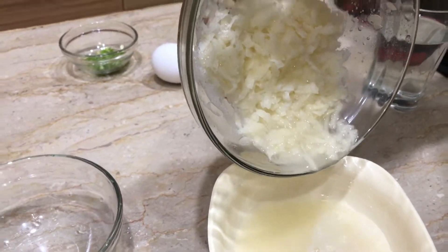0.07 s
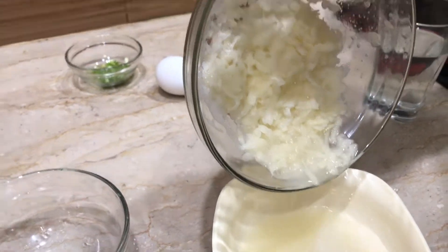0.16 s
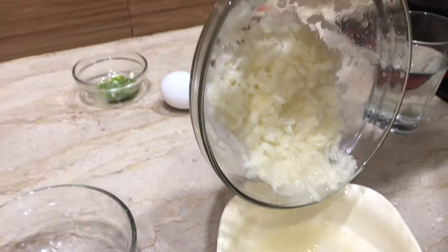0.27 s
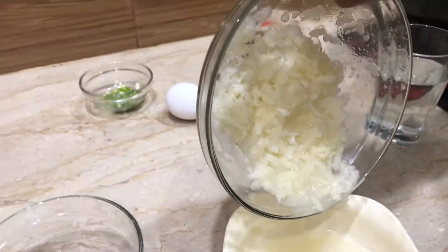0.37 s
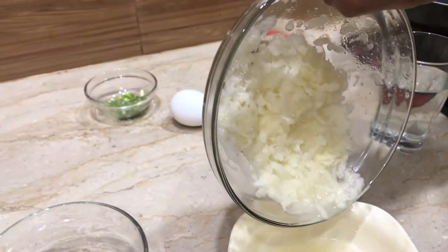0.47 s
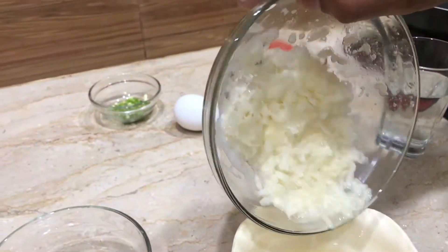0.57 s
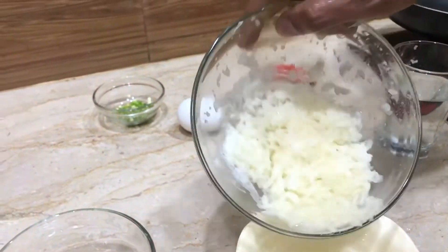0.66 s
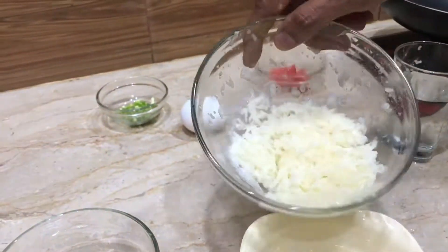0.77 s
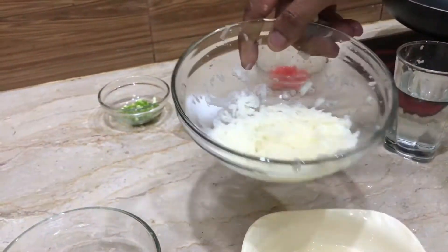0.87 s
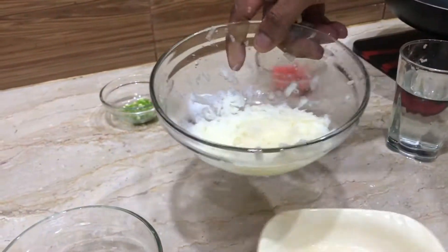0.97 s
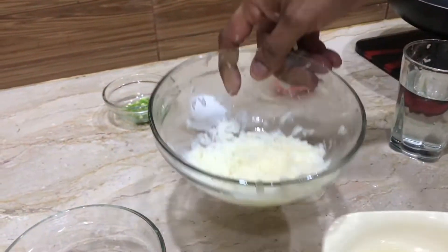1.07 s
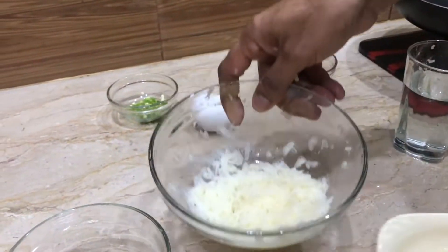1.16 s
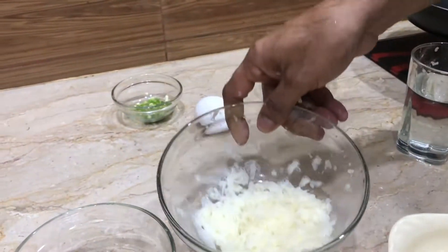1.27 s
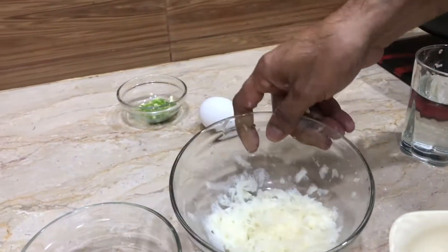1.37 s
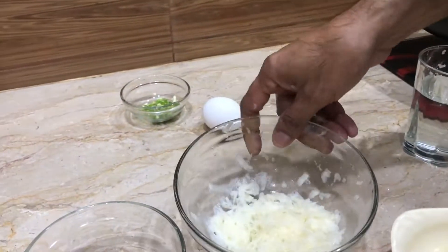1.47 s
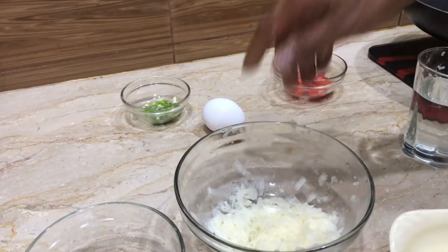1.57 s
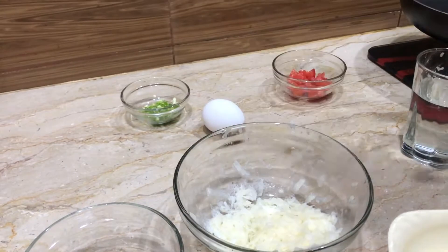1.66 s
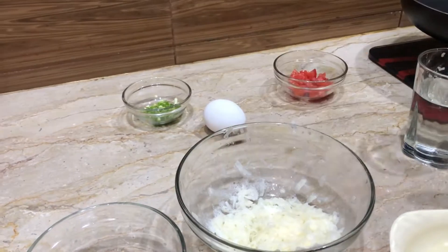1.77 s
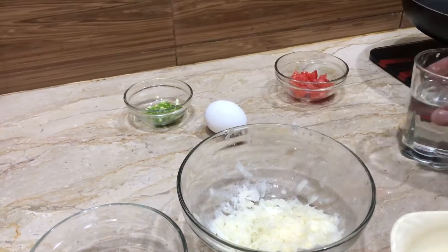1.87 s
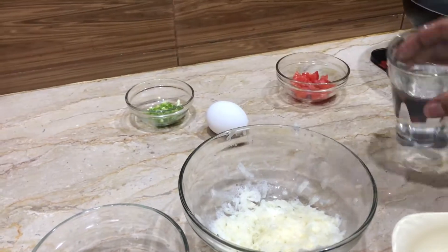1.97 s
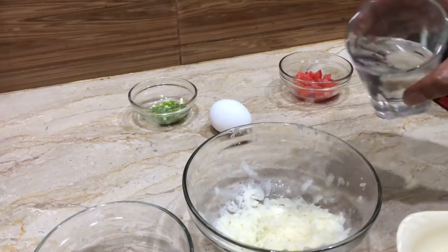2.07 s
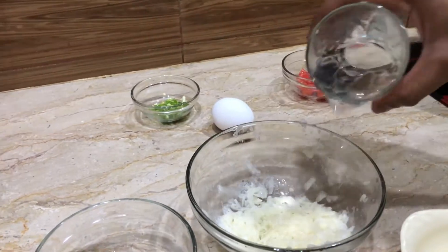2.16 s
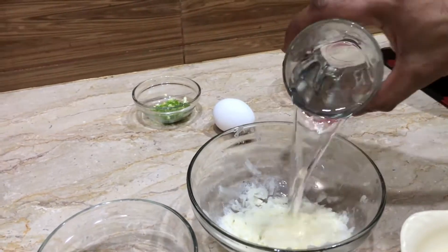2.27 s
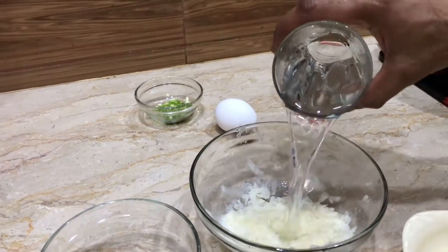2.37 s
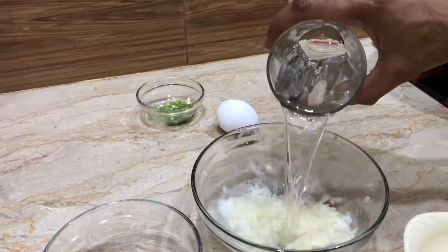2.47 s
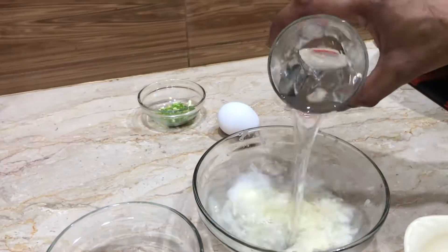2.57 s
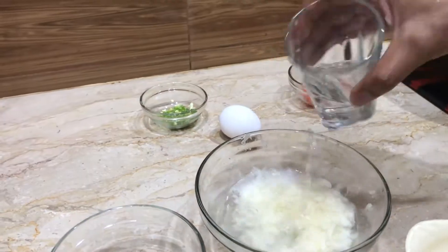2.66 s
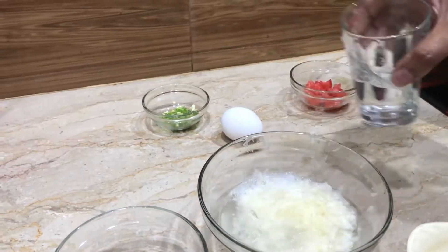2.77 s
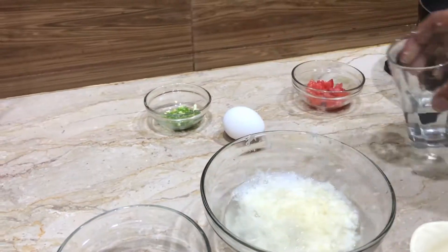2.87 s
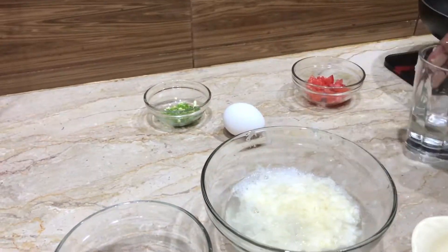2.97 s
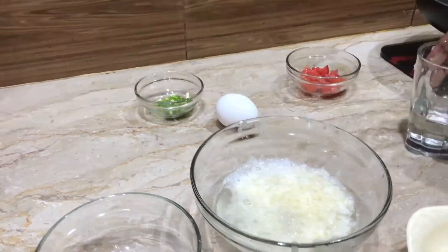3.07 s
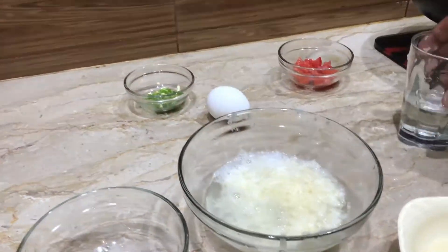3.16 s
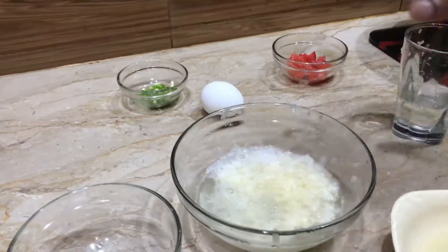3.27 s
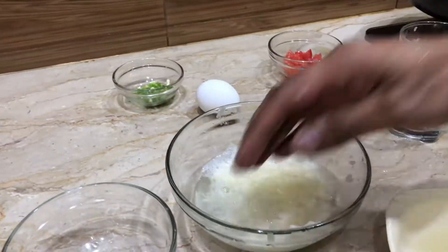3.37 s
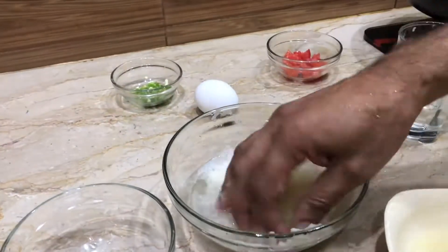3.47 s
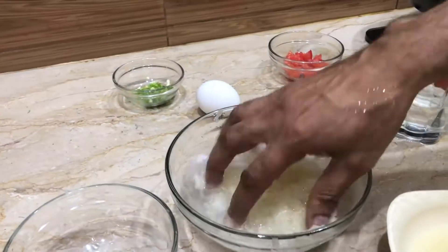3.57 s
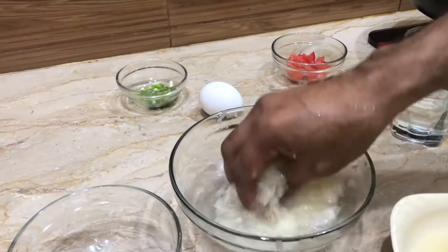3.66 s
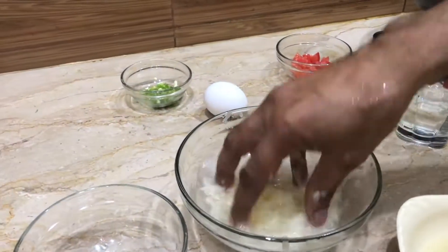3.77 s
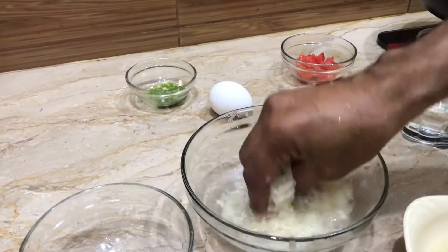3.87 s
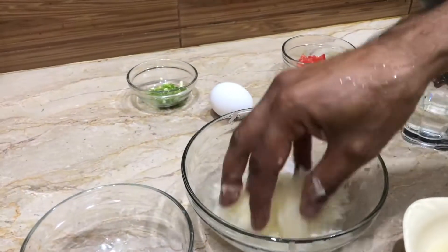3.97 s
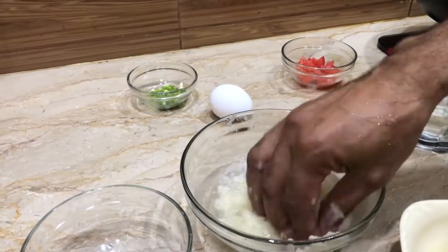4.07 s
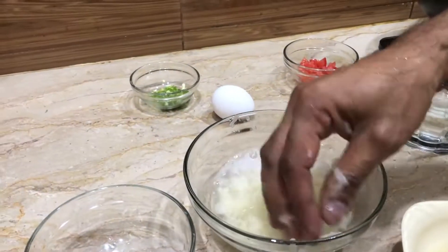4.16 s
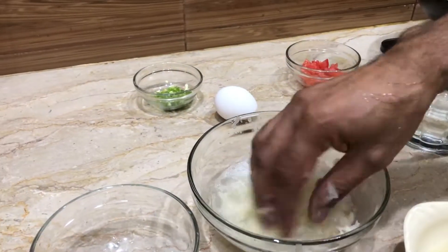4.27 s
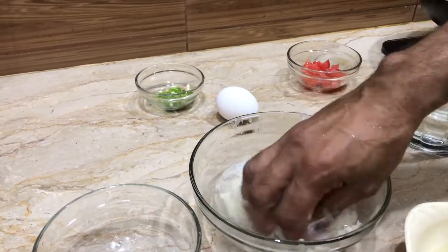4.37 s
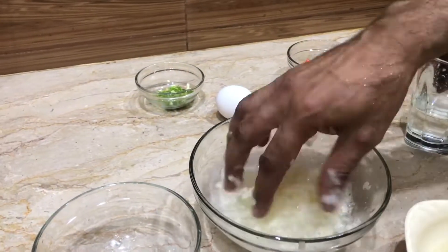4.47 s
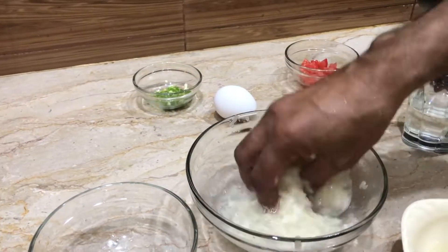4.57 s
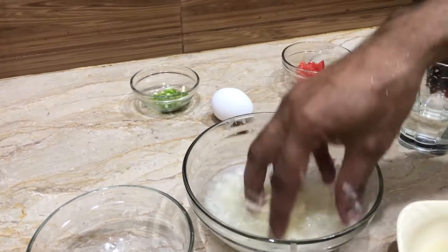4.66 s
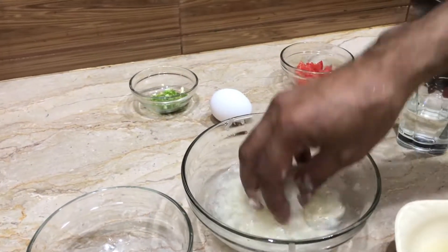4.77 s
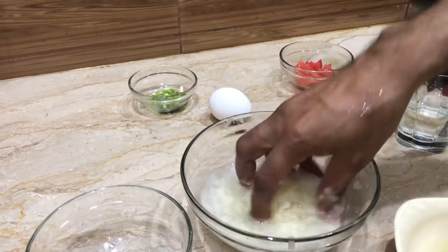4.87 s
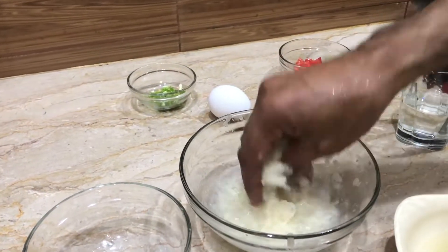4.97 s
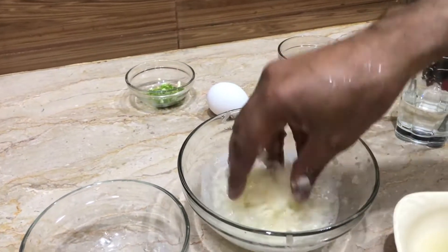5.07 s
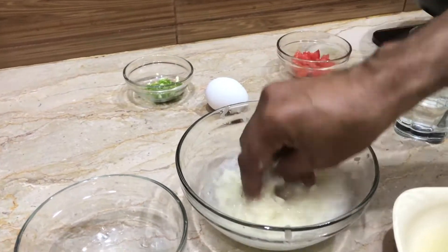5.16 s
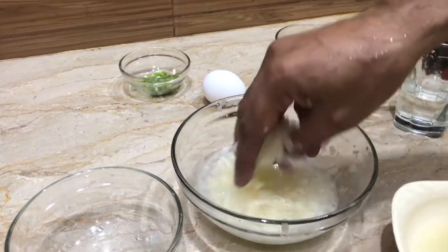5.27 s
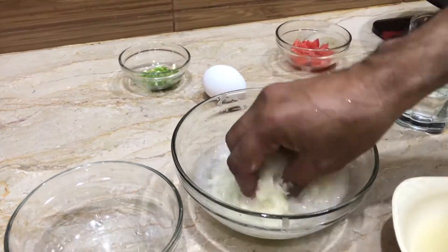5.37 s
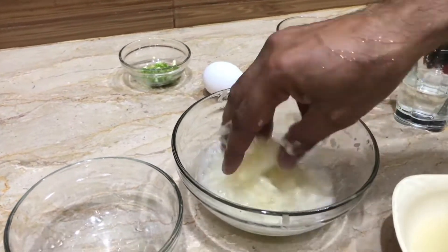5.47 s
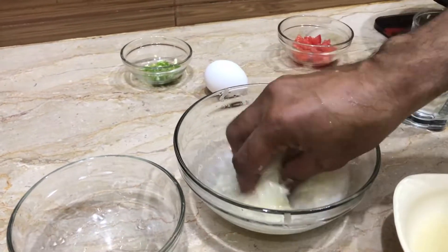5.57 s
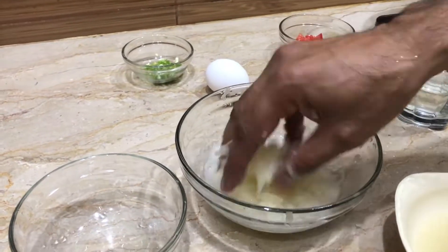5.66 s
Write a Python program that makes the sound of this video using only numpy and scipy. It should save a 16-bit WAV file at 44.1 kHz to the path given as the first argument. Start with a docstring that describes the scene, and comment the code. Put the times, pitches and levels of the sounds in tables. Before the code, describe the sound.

Water drips from a glass bowl, the bowl knocks onto stone, a full glass rattles, water fizzes briefly, then wet shreds are stirred.

```python
"""A quiet kitchen with a stone counter: hum and broad air noise, and water dripping from a tilted glass bowl.
The bowl slides by stick-slip friction and lands in two rattling groups of knocks, heard as damped modes.
A full drinking glass scrapes and chatters over the stone, its modes excited by slips and bounces.
Water falls on grated potato as a fizz of tiny snaps, and the emptied glass is put down.
A hand stirs the wet shreds: films snap, bubbles ring as gliding damped sines, nails clink on the bowl."""
import sys
import numpy as np
from scipy import signal
from scipy.fft import rfft, irfft
from scipy.io import wavfile
from scipy.ndimage import uniform_filter1d

SR = 44100
rng = np.random.default_rng(int(sys.argv[2]) if len(sys.argv) > 2 else 0)


def file_out(sig):
    """Save sig as 16-bit WAV at sys.argv[1]."""
    # one column per channel
    cols = np.atleast_2d(sig).T
    # limit, then scale
    lim = np.clip(cols, -1, 1)
    pcm = np.round(lim * 32767).astype(np.int16)
    wavfile.write(sys.argv[1], SR, pcm)


N = 251811

# Spectrum of the steady kitchen air: (frequency [Hz], relative density [dB per Hz])
AIR_SPECTRUM = [(40, -40.5), (86, -29), (117, -8), (177, -12), (254, -4.5), (330, -12), (484, -0.5),
                (832, -6.5), (1430, -9), (4000, -12.5), (8000, -23.5), (15500, -33), (15900, -54),
                (16500, -67)]
# Room modes the air excites: (frequency [Hz], width of each of two filter passes [Hz], level [dB])
AIR_MODES = [(116.3, 29, -72), (252, 108, -61.5), (475.4, 67, -68.5)]
# Motor hum: (frequency [Hz], level [dB])
MOTOR_HUM = (65.4, -79)
# Low tones and a thin whistle: (start [s], end [s], frequency [Hz], level [dB], pulse rate [per s])
FAINT_TONES = [(0.02, 0.336, 126, -59, 2.4), (.28, .46, 211, -61, 1.6), (2.282, 2.573, 208, -59.5, 1),
               (4.197, 4.793, 5580, -68.5, 25.5)]
# Crackle of wet shreds as the bowl drains, water lands and the hand stirs:
# (start [s], rise [s], hold [s], fall [s], level [dB])
SHRED_SWELLS = [(0.05, 0.21, .4, .12, -76.5), (2.05, .2, 0.46, .05, -81), (3.097, .5, 2.2, .1, -75)]
# Wet films tearing and drops splitting: (time [s], level [dB], centre [Hz], nominal length [s])
FILM_SNAPS = [(.2937, -53, 11000, .003), (.3112, -50, 11000, .004), (0.326, -40, 8350, .0027),
              (.398, -49, 13700, .0039), (0.914, -39, 6400, .002), (2.231, -42, 9300, .0019),
              (2.3196, -33.5, 10500, .0012), (2.372, -42, 11200, .003), (2.652, -44, 11500, .0026),
              (2.676, -39, 11300, .0043), (2.7, -49, 10900, .003), (3.739, -37.5, 6600, 0.015),
              (3.7484, -28.5, 12700, 0.005), (3.819, -44, 6660, .0049), (3.9777, -38, 11300, 0.003),
              (3.9823, -28, 9600, 0.0062), (4.371, -48, 4500, .003), (4.378, -47, 9000, .003),
              (4.5345, -38.5, 9800, .003), (4.643, -48, 9070, 0.0036), (4.8, -51.5, 9000, .003),
              (4.935, -53, 11000, .004), (5.0467, -36, 9400, .002), (5.05, -32, 8300, .002),
              (5.0657, -28.5, 6200, 0.0022), (5.127, -44, 8100, .003), (5.306, -28.5, 7400, 0.011),
              (5.472, -48, 11300, .003), (5.482, -39.5, 11300, .0048), (5.688, -37, 7360, 0.004),
              (5.692, -30, 13100, .0026), (5.6946, -30, 7300, 0.0055)]
# Air bubbles in water, plus one light clink at 3.41 s rung the same way: (time [s], level [dB], first frequency
# [Hz], pitch change over its t60 [share])
BUBBLES = [(0.3287, -33.5, 7800, 0.27), (0.4592, -36, 7130, .16), (0.4669, -37.5, 7430, .15),
           (.4754, -40, 14000, 0.093), (0.5003, -48.5, 3900, .55), (.527, -51, 4200, 1.6),
           (.556, -60, 4100, 1.1), (0.5804, -44.5, 12000, -0.092), (0.603, -43.5, 1750, .1),
           (0.6352, -39.5, 9600, 0.13), (.635, -42.5, 3300, 1.7), (.6704, -36.5, 5970, 0.27),
           (2.5084, -48, 6030, -0.0078), (2.5671, -43, 6100, .15), (2.6125, -43.5, 11500, .15),
           (2.6658, -44.5, 2440, .22), (3.4133, -43, 2050, .23), (3.63, -50.5, 2360, .2),
           (3.752, -46.5, 3620, -0.0048), (3.7958, -43, 2160, 0.11), (3.911, -52, 10900, -0.072),
           (3.985, -46, 2100, .15), (4.3637, -46.5, 6230, .14), (4.3844, -49, 2060, 0.12),
           (4.5372, -45, 2050, .1), (4.538, -46, 3680, .1), (4.5474, -44, 2080, 0.2),
           (4.9113, -40, 3600, .15), (4.9115, -48, 7500, -0.26), (4.9175, -42, 3800, .4),
           (5.0671, -23.5, 2050, 0.042), (5.3068, -47, 1950, 0.18), (5.3514, -38.5, 3470, -0.38)]
# Gliding rim squeaks: (first [Hz], last [Hz], level in first push [dB], level in second push [dB])
RIM_SQUEAKS = [(1080, 994, -66, -59.5), (4400, 4700, -62.5, -59), (7140, 7700, -58, -54),
               (9300, 9150, -64, -58.5), (9950, 12000, -58.5, -74), (11870, 12600, -69, -62)]
# Pushes that make the rim squeak: (start [s], rise [s], hold [s], fall [s])
RIM_PUSHES = [(.93, .03, .1, .06), (1.04, .055, .095, .02)]
# Bowl landing and rocking: (time [s], level [dB], brightness [dB per octave], thud relative level [dB])
BOWL_KNOCKS = [(1.3445, -3.5, -0.5, -27), (1.3830, -14, -4.5, -21.5), (1.511, -2.5, 2, -22.5),
               (1.529, -7.5, 0, -35), (1.5413, -8.5, 0, -33), (1.548, -21, -2, -32)]
# Bowl modes damped by potato: (frequency [Hz], width before ring scaling [Hz], relative level [dB])
BOWL_MODES = [(1530, 150, -18), (1750, 410, -3.5), (2154, 244, -0.5), (2470, 540, -8.5), (3194, 640, 0.5),
              (4200, 430, -19), (5050, 180, -17), (6080, 710, -8), (7560, 470, -20), (8740, 870, -21.5),
              (12290, 400, -19.5), (14750, 500, -25)]
# Counter slab modes: (frequency [Hz], width before ring scaling [Hz], relative level [dB])
SLAB_MODES = [(325, 59, 1), (677, 36, -4.5)]
# Bowl base buzzing on grit after a knock: (frequency [Hz], relative density [dB per Hz])
BOWL_BUZZ = [(290, -50), (500, -24.5), (1080, -14.5), (1320, -9), (1930, -0.5), (3390, -10.5),
             (5630, -21.5), (6900, -29), (9490, -27.5), (12100, -43), (16000, -37)]
# Scraping glass foot: (start [s], rise [s], hold [s], fall [s], level [dB])
GLASS_SCRAPES = [(1.842, 0.018, .004, 0.13, -52.5), (1.951, 0.058, 0.054, .23, -28)]
# Glass foot striking the stone: (time [s], level [dB])
GLASS_BOUNCES = [(1.9472, -38.5), (1.966, -32.5), (1.9930, -31), (2.0002, -8), (2.0332, -7.5), (2.048, -20),
                 (2.0560, -12), (2.0744, -16.5), (2.101, -17), (2.134, -33)]
# Full glass: (frequency [Hz], width before scaling [Hz], relative level [dB])
GLASS_MODES = [(1452, 230, 11), (2200, 190, 7.5), (3127, 113, 11.5), (3910, 110, 1.5), (4500, 90, 4),
               (5260, 50, -5), (6200, 89, -3), (7030, 64, 1), (7270, 70, 3), (8180, 70, 2.5), (9380, 34, 0),
               (12000, 43, -13), (12700, 37, -10), (13080, 40, -14), (14300, 90, -10), (15200, 40, -20)]
# Water column, counter and foot: (frequency [Hz], width before scaling [Hz], relative level [dB])
COLUMN_MODES = [(111, 23, -22), (269, 127, -3), (560, 56, -8), (798, 130, -2.5), (1404, 37, -18.5),
                (10900, 83, 2)]
# Crack of each glass bounce: (frequency [Hz], relative density [dB per Hz])
BOUNCE_CRACK = [(180, -44), (300, -13.5), (2170, 0.5), (5800, -9.5), (7200, -4.5), (8640, -13.5),
                (9240, -7), (12300, -15), (16000, -30)]
# Fizz of the stream landing: (start [s], rise [s], hold [s], fall [s], level [dB])
POUR_SWELL = (2, .2, 0.48, 0.1, -61.5)
# Bands where the pouring fizz is strongest: (frequency [Hz], width [Hz], relative level [dB])
FIZZ_BANDS = [(6100, 1300, -2.5), (11300, 3200, -4), (2200, 490, -5.5)]
# Emptied glass landing: (time [s], level [dB], brightness [dB per octave])
GLASS_LANDINGS = [(3.0696, -15, 1)]
# Empty glass: (frequency [Hz], width before ring scaling [Hz], relative level [dB])
EMPTY_GLASS_MODES = [(352, 21, -18), (732, 69, -14), (903, 72, -12.5), (1250, 190, -21), (1610, 60, -8),
                     (1967, 23, -4.5), (2390, 390, -8), (3080, 370, -9), (3720, 440, -6.5),
                     (5100, 500, -14), (6650, 400, -17), (8470, 620, -19), (13100, 160, -28),
                     (14900, 80, -25)]
# Crack of that landing: (frequency [Hz], relative density [dB per Hz])
LANDING_CRACK = [(240, -53), (400, -21), (879, -8), (1040, -22), (1960, -5.5), (6850, -17.5), (9760, -36),
                 (15300, -34), (16000, -45)]
# Fingernails touching the bowl: (time [s], level [dB], lift of the lowest mode [dB])
NAIL_CLINKS = [(4.1927, -44, 2.5), (4.2076, -40.5, 28), (4.5047, -43.5, 1.5), (4.68, -60, 0),
               (4.853, -34, -3.5)]
# Bowl modes under a nail: (frequency [Hz], relative level [dB], t60 [s])
CLINK_MODES = [(1373, 4.5, 0.21), (2000, 21.5, 0.021), (3300, -12, 0.054), (5820, 0, 0.18),
               (9000, -1, 0.08), (12700, -13, 0.055)]
# Reverberation of the kitchen: (frequency [Hz], t60 [s])
ROOM_T60 = [(150, 0.46), (400, 0.55), (1040, 0.25), (2760, 0.31), (7280, 0.23), (14000, 0.19)]

AIR_DB = -59.5
SWELL_DEPTH_DB = 40  # a swell starts and ends this far below its top
# bowl sliding over the wet rim of the dish: start, rise, hold, fall [s]
SLIDE_HISS, SLIDE_RUB = (.925, .025, .23, .04), (.8, .2, .16, .12)
HISS_DB, RUB_DB = -56, -56.5
SQUEAK_WAVER_DB = 0.2  # rms pitch wander, as 20 log10 of the frequency ratio
BRIGHT_AT_FULL_DB, BRIGHT_PER_DB = 6.5, 0.47  # harder bounces ring brighter [dB per octave]
# ring time at 2 kHz [s]; power by which higher bubbles die sooner; extra life of gliding ones
BUBBLE_T60_S, BUBBLE_SHORTENS, GLIDING_LASTS = .017, 0.84, .5
SPLASH_DB, SPLASH_PER_DB = -45.5, 0.57  # splash of a -43.5 dB bubble; its growth with bubble level
CEILING = 1.3  # amplitude toward which loud peaks are softly rounded
EDGE_HZ = 16700  # upper band limit


def amp(db):
    """Level law: decibels to amplitude gain."""
    return 10 ** (np.asarray(db) / 20)


def evened(x):
    """Energy normalisation: scales to rms 1."""
    return x / np.sqrt(np.mean(x ** 2) + 1e-20)


def peaked(x):
    """Peak normalisation: scales to peak 1."""
    return x / (abs(x).max() + 1e-12)


def read(points, hz):
    """Interpolation of a spectrum table on a log-frequency axis."""
    f, value = np.transpose(points)
    return np.interp(np.log(hz + 1), np.log(f + 1), value)


def add(mix, start, sound):
    """Superposition: adds a sound into the mix at a time in seconds."""
    part = mix[round(start * SR):][:len(sound)]
    part += sound[:len(part)]


def resonate(x, hz, width):
    """Resonance by heterodyning: a one-pole filter around a pitch that may move."""
    turn = np.exp(2j * np.pi * np.cumsum(hz * np.ones(len(x))) / SR)
    r = np.exp(-np.pi * width / SR)
    return 2 * (turn * signal.lfilter([1 - r], [1, -r], x / turn + 1e-18)).real


def flicker(length, spread_db, size):
    """Slow amplitude modulation: smoothed random gain, as grip comes and goes."""
    drift = uniform_filter1d(rng.standard_normal(length), size)
    return amp(spread_db * evened(uniform_filter1d(drift, size)))


def swell(start, rise, hold, fall, db):
    """Exponential envelope: rises, holds and falls along straight lines in dB, silent outside."""
    times = start + np.cumsum([0, rise, hold + 1e-4, fall])
    levels = db - SWELL_DEPTH_DB * np.array([1, 0, 0, 1])
    return amp(np.interp(np.arange(N) / SR, times, levels, left=-200, right=-200))


def scattered(gain, decay):
    """Shot noise: a short dying burst of tiny impacts with the smooth colour given by gain."""
    t = np.arange(2 * len(gain) - 2) / SR
    shape = (1 - np.exp(-t / 0.00019)) * np.exp(-t / decay)
    z = rfft(rng.standard_normal(len(t)) * shape)
    burst = irfft(gain * z / (abs(z) + 1e-12))  # keeps the phase, imposes the colour
    return burst * np.minimum(3 * np.sqrt(shape / shape.max()), 1)


def grit(colour, bright_db, decay):
    """Contact noise: the crack of a hard contact, its spectrum tilted by brightness."""
    hz = np.fft.rfftfreq(7000, 1 / SR)
    tilt = bright_db * np.log2((hz + 50) / 2000)
    return peaked(scattered(amp(read(colour, hz) + tilt), decay))


def ringing(modes, bright_db, ring):
    """Modal superposition: damped modes start together; harder contact lifts the upper ones."""
    t = np.arange(7000) / SR
    body = np.zeros(len(t))
    for k, (hz, width, db) in enumerate(modes):
        sign = (-1) ** k  # neighbouring modes move in opposite sign
        gain = sign * amp(db + bright_db * np.log2(hz / 2000)) * np.sqrt(width)
        body += gain * np.exp(-np.pi * width * t / ring) * np.sin(2 * np.pi * hz * t)
    return peaked(body * (1 - np.exp(-(t / 0.00042) ** 2)))


def snap(hz, length, width=7000):
    """Impulsive radiation: a brief burst of spiky noise, broad around its centre."""
    off = (np.fft.rfftfreq(1200, 1 / SR) - hz) / (.5 * width)
    return peaked(scattered(1 / (1 + off ** 2), .5 * length + 1e-4))


def grains(per_s, spread_db, low_hz):
    """Random point process: tiny snaps of many pitches, a few of them large."""
    size = amp(spread_db * np.minimum(rng.exponential(1, N), 3)) * (rng.random(N) < per_s / SR)
    kind = rng.integers(0, 24, N)
    out = np.zeros(N)
    for k, hz in enumerate(np.geomspace(low_hz, 15000, num=24)):
        grain = snap(hz, 0.0013, hz * rng.uniform(0.071, 0.34))
        out += signal.oaconvolve(size * (kind == k), grain)[:N]
    return evened(out)


def room_air():
    """Filtered noise: broad air with drifting spectral patches, and the room modes it excites."""
    frames, hz = N // 512 + 5, np.fft.rfftfreq(2048, 1 / SR)
    real, imag, patches = rng.standard_normal((frames, 1025, 3)).T
    patches = evened(uniform_filter1d(uniform_filter1d(patches, 20, 0), 6, 1))
    z = (real + 1j * imag) * amp(read(AIR_SPECTRUM, hz)[:, None] + 0.91 * patches)
    out = amp(AIR_DB) * evened(signal.istft(z, nperseg=2048, noverlap=1536)[1][:N])
    for f, width, db in AIR_MODES:
        out += amp(db) * evened(resonate(resonate(rng.standard_normal(N), f, width), f, width))
    return out


def motor_hum():
    """Periodic vibration: a steady sine whose rms is the given level."""
    hz, db = MOTOR_HUM
    return np.sqrt(2) * amp(db) * np.sin(2 * np.pi * hz * np.arange(N) / SR)


def faint_tones():
    """Amplitude modulation: narrow noisy tones pulse as they come and go."""
    out = np.zeros(N)
    for start, end, f, db, rate in FAINT_TONES:
        t = np.arange(0, end - start, 1 / SR)
        pulse = np.cos(np.pi * rate * t) ** 2 * np.sin(np.pi * t / t[-1]) ** 0.37
        drive = rng.standard_normal(len(t)) + 8 * np.sin(2 * np.pi * f * t)
        add(out, start, amp(db) * pulse * evened(resonate(drive, f, 30)))
    return out


def shred_crackle():
    """Random impulses: wet shreds crackle in sparse, high grains."""
    return sum(swell(*row) for row in SHRED_SWELLS) * grains(per_s=160, spread_db=6.0, low_hz=5000)


def film_snaps():
    """Sudden release of surface tension: tearing films and splitting drops snap."""
    out = np.zeros(N)
    for s, db, hz, length in FILM_SNAPS:
        add(out, s, amp(db) * snap(hz, length))
    return out


def bubble(hz, t60, rise):
    """Bubble resonance: a dying sine whose pitch glides, upward for positive rise."""
    t = np.arange(0, 1.2 * t60, 1 / SR)
    shape = (1 - np.exp(-t / 0.0006)) * amp(-60 * (t / t60) ** 1.26)
    return shape * np.sin(2 * np.pi * np.cumsum(hz * (1 + rise * t / t60)) / SR)


def bubbles():
    """Air entrainment: each splash traps air that rings as a bubble, high ones dying sooner; one light clink at
    3.41 s rings the same way."""
    out = np.zeros(N)
    for s, db, hz, rise in BUBBLES:
        t60 = BUBBLE_T60_S * (2000 / hz) ** BUBBLE_SHORTENS * (1 + GLIDING_LASTS * abs(rise))
        add(out, s, amp(db) * peaked(bubble(hz, t60, rise)))
        splash_db = SPLASH_DB + SPLASH_PER_DB * (db + 43.5)
        add(out, s, amp(splash_db) * snap(1.16 * hz, 0.0073, 0.79 * hz))
    return out


def bowl_slide():
    """Stick-slip friction: grainy hiss and a low rub, with gliding squeaks that cut in and out."""
    slips = flicker(N, 3.2, size=300) * rng.standard_normal(N)
    hiss = resonate(resonate(slips, 11500, 9000), 11500, 9000)
    rub = resonate(resonate(slips, 900, 1000), 950, 1000)
    out = swell(*SLIDE_HISS, HISS_DB) * evened(hiss)
    out += swell(*SLIDE_RUB, RUB_DB) * evened(rub)
    glide_times = [RIM_PUSHES[0][0], sum(RIM_PUSHES[-1])]
    for first_hz, last_hz, *push_db in RIM_SQUEAKS:
        drive = flicker(N, 4.0, size=200) * rng.standard_normal(N)
        hz = np.interp(np.arange(N) / SR, glide_times, [first_hz, last_hz])
        hz = hz * flicker(N, SQUEAK_WAVER_DB, size=900)  # pitch wanders as the grip changes
        width = 0.047 * first_hz + 60
        squeak = evened(resonate(resonate(drive, hz, width), hz, width))
        out += sum(swell(*push, db) for push, db in zip(RIM_PUSHES, push_db)) * squeak
    return out


def bowl_knocks():
    """Impact excitation: damped bowl modes, a short buzz, and a thud of the slab."""
    out = np.zeros(N)
    for s, db, bright_db, thud_db in BOWL_KNOCKS:
        hit = ringing(BOWL_MODES, bright_db, ring=0.7)
        hit += amp(-7.5) * grit(BOWL_BUZZ, bright_db, decay=0.0027)
        hit += amp(thud_db) * ringing(SLAB_MODES, 0, ring=0.96)
        add(out, s, amp(db) * hit)
    return out


def glass_scrape():
    """Friction-driven resonance: tiny slips of the foot excite the full glass and a broad rasp."""
    slips = rng.standard_normal(N) * flicker(N, 3.6, size=60)
    body = np.zeros(N)
    for f, width, db in sorted(GLASS_MODES + COLUMN_MODES):
        mode = resonate(resonate(slips, f, 3.0 * width), f, 2.7 * width)
        body += amp(db - 1.8 * np.log2(f / 2000)) * mode
    rasp = resonate(resonate(slips, 2380, 3400), 2380, 3400)
    return sum(swell(*row) for row in GLASS_SCRAPES) * evened(evened(body) + 1.3 * evened(rasp))


def glass_chatter():
    """Repeated impact: the full glass bounces, harder bounces ringing it brighter."""
    out, modes = np.zeros(N), sorted(GLASS_MODES + COLUMN_MODES)
    for s, db in GLASS_BOUNCES:
        bright_db = BRIGHT_AT_FULL_DB + BRIGHT_PER_DB * db
        hit = .5 * ringing(modes, bright_db, ring=3.2)
        hit += amp(-3.5) * grit(BOUNCE_CRACK, bright_db, decay=0.0049)
        add(out, s, amp(db) * hit)
    return out


def pour_fizz():
    """Dense random impulses: the landing stream fizzes, strongest in a few resonant bands."""
    drops = grains(per_s=900, spread_db=5.5, low_hz=1830)
    fizz = 0.48 * drops
    for hz, width, db in FIZZ_BANDS:
        fizz += amp(db) * evened(resonate(drops, hz, width))
    return swell(*POUR_SWELL) * evened(fizz)


def glass_set_down():
    """Impact excitation: the emptied glass lands, its modes joined by a contact crack."""
    out = np.zeros(N)
    for s, db, bright_db in GLASS_LANDINGS:
        hit = ringing(EMPTY_GLASS_MODES, bright_db, ring=1.7)
        hit += amp(-1.5) * grit(LANDING_CRACK, bright_db, decay=0.0033)
        add(out, s, amp(db) * hit)
    return out


def nail_clinks():
    """Light modal excitation: a nail rings the bowl, with a short contact noise."""
    out = np.zeros(N)
    t = np.arange(8000) / SR
    for s, db, low_db in NAIL_CLINKS:
        ring = np.zeros(len(t))
        for k, (f, mode_db, t60) in enumerate(CLINK_MODES):
            lift_db = low_db if k == 0 else 0
            ring += amp(mode_db + lift_db - 60 * t / t60) * np.sin(2 * np.pi * f * t)
        add(out, s, amp(db) * peaked(ring * (1 - np.exp(-t / 0.0003))))
        add(out, s, amp(db - 2.0 - abs(low_db)) * snap(2700, 0.02, 4100))
    return out


def room(x):
    """Reverberation: sparse reflections of random sign, each band dying at its own speed."""
    taps = np.zeros(SR // 2)
    at = np.arange(120, SR // 2 - 20, 20)
    taps[at + rng.integers(0, 20, len(at))] = rng.choice([-1., 1.], len(at))
    hz, t, z = signal.stft(taps, SR, nperseg=256)
    decay = amp(-60 * t / read(ROOM_T60, hz)[:, None])
    tail = signal.istft(z * decay, SR, nperseg=256)[1]
    return signal.fftconvolve(x, tail / np.linalg.norm(tail))[:N]


def scene():
    """Superposition of direct sound, reverberation and room air."""
    wet = shred_crackle() + film_snaps() + bubbles() + bowl_slide() + pour_fizz() + nail_clinks()
    hits = bowl_knocks() + glass_scrape() + glass_chatter() + glass_set_down()
    near = hits + wet + room(amp(-8.0) * hits + amp(-9.5) * wet)
    # small things radiate no deep bass
    near = signal.sosfilt(signal.butter(4, 140, "high", fs=SR, output="sos"), near)
    return (near + room_air() + motor_hum() + faint_tones())[None]


def record(dry):
    """Band limiting and saturation: bass roll-off, soft overload and an upper cutoff."""
    dry = signal.sosfilt(signal.butter(2, 45, "high", fs=SR, output="sos"), dry)
    dry = CEILING * np.tanh(dry / CEILING)
    lowpass = signal.firwin(511, EDGE_HZ, window=("kaiser", 10), fs=SR)
    return signal.oaconvolve(dry, lowpass[None], "same")


dry = scene()
out = record(dry)
file_out(out)
```